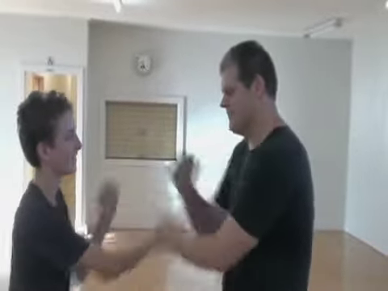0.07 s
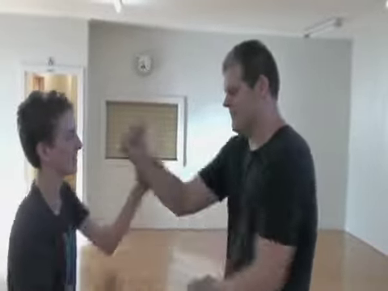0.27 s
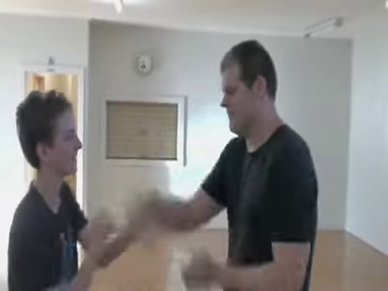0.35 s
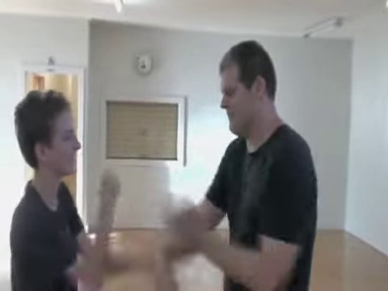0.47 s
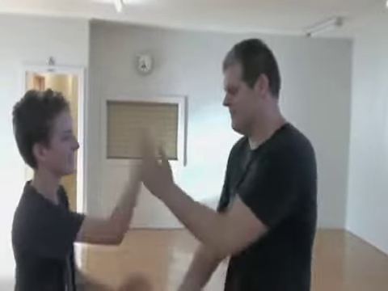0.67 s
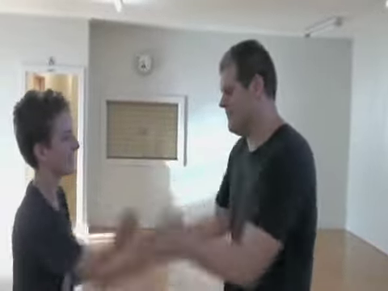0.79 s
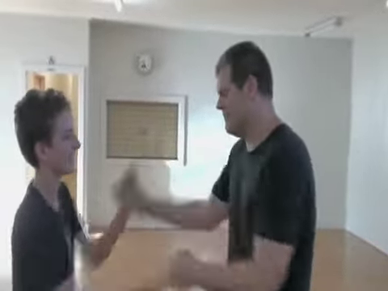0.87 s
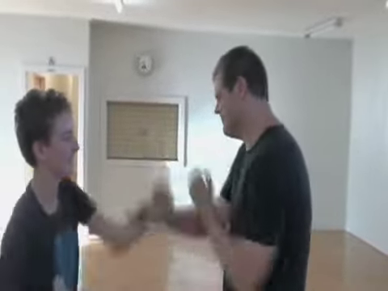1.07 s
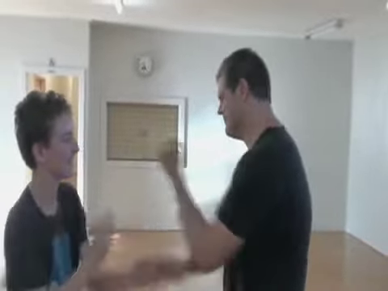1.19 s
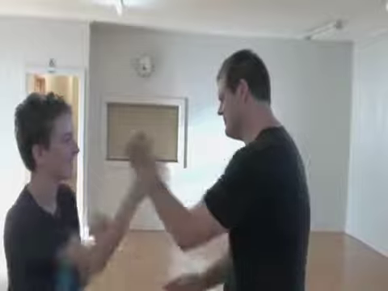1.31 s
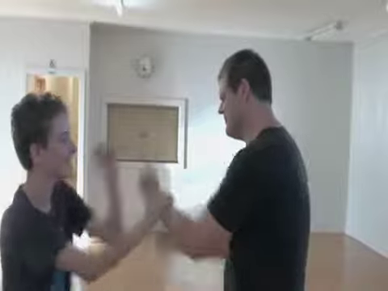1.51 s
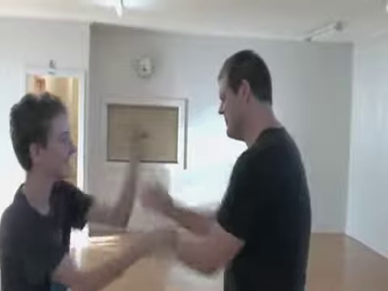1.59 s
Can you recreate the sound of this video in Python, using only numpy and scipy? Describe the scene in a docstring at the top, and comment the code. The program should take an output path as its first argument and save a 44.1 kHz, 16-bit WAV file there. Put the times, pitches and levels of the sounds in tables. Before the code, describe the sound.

Four sharp skin slaps ring out in an empty room over faint rumble and hiss.

```python
"""Four hand and forearm slaps in a bare, hard room, a few metres from a small microphone pair.
Low rumble and hiss come first. At 0.22 s and 0.63 s single slaps land, each a crack of trapped air with
a patter of fingers; a double hit follows at 0.95 s and a cluster of four contacts at 1.34 s. Each crack
flutters between floor and ceiling, then melts into a one-second tail. From 0.1 s to the end, the whole
sound drops out briefly every half second."""
import sys
import numpy as np
from scipy import signal
from scipy.fft import rfft, irfft
from scipy.io import wavfile
from scipy.ndimage import uniform_filter1d

SR = 44100
rng = np.random.default_rng(int(sys.argv[2]) if len(sys.argv) > 2 else 0)


def to_wav(sig):
    """Store sig (one row per channel, or 1-D mono) as 16-bit WAV at the path in sys.argv[1].

    Samples outside -1..1 are clipped; the rate is SR.
    """
    pcm = np.clip(np.atleast_2d(sig), -1, 1) * 32767
    pcm = np.round(pcm).astype(np.int16)
    wavfile.write(sys.argv[1], SR, pcm.T)  # frames by channels


N = 72765

# Tone of the rumble and hiss: pitch_hz, relative_level_db
AIR_COLOUR = [(20, -44), (33, -12), (45, -5.5), (65, -3), (100, -1.5), (134, -0.5), (160, -2.5), (200, -1),
              (266, -4.5), (320, -6.5), (460, -11), (570, -7), (800, -12.5), (1200, -14.5), (1670, -15.5),
              (2900, -22), (5200, -28.5), (12000, -34.5), (16000, -39.5)]
# Stereo width of the rumble and hiss: pitch_hz, side_minus_mid_db
AIR_WIDTH = [(60, -28), (110, -25.5), (200, -19.5), (380, -11), (700, -7.5), (1290, -6), (2380, -6.5),
             (4400, -5.5), (8120, -7.5), (15000, -22.5)]
# Slow level ride on the rumble and hiss: time_s, level_db
AIR_RIDE = [(0, -2), (.2, 0), (.45, -0.5), (.75, -1), (1.0, -0.5), (1.3, 0), (1.65, -0.5)]
# Time the tail takes to fall by 60 dB: pitch_hz, decay_s
TAIL_DECAY = [(300, 1.0), (1000, 1.0), (3000, 1), (6000, 0.75), (10000, 0.61), (16000, 0.4)]
# Tone of the tail: pitch_hz, level_db
TAIL_COLOUR = [(300, -5), (600, 0.5), (1200, 5), (1650, -8.5), (2100, 1), (2750, -7.5), (3350, 3.5),
               (4100, 2), (4700, 3), (6000, -3), (8000, -1), (10000, -5.5), (16000, 3.5)]
# Stereo width of the tail: pitch_hz, side_minus_mid_db
TAIL_WIDTH = [(60, -22), (110, -18), (200, -12), (380, -19), (700, -10), (1290, -17), (2380, -7.5),
              (4400, -18), (8120, -16.5), (15000, -22)]
# Skin contacts that make up the slaps; the later levels are relative to level_db:
# start_s, level_db, patter_db, patter_fade_ms, thud_db, body_hz, body_db, snap_hz, snap_q,
# sizzle_hz, sizzle_db, first_echo_db, second_echo_db, round_trip_db, tail_send_db
CONTACTS = [ (0.2244, -13, -3.5, 4.4, -8.5, 1220, -13, 3030, 1.22, 5800, 0, 7.5, 2.5, -39, -3),
            (0.6250, -34.5, -3.5, 3.5, 3, 580, 8.5, 2300, 1.15, 7600, 4, 5, 2.5, -6, -3),
            (0.9510, -51, 10, 8.2, -11, 2000, -14, 4730, 1.1, 10500, -15, -4, -21, -14, 3),
            (0.9566, -31.5, -3.5, 5.2, -1, 2580, -2, 5300, 4.2, 9300, -1.5, -7, -1.5, -32, -4),
            (1.335, -62, 2, 4.3, -6, 1000, -12, 4000, 1.5, 10760, 2, 0, -10, -17, 7),
            (1.34, -42.5, 6, 3.1, -6, 1100, -8, 2800, 0.41, 8000, -6, 11.5, -6, -14, 1),
            (1.3443, -35.5, 9, 1.9, -8, 1150, -2.5, 2450, 1.26, 6700, 2.5, 2, 4.5, -3, 4),
            (1.378, -44.5, 7, 9.2, -23, 1210, -10, 2370, 6.2, 6450, -5.5, 8, 0.5, -13, 0), ]
# Echo delays, one row per contact: first_echo_ms, second_echo_ms, round_trip_ms
ECHO_DELAYS = [(5.2, 10.5, 15.3), (2.3, 7.6, 15), (4.7, 10, 15.3), (4.7, 10, 15.3), (4.8, 7.5, 14.6),
               (1.5, 7.5, 14.6), (6.4, 7.5, 14.6), (4.5, 7, 14.6)]
# Brief holes in the sound: start_s, length_s, depth_db, fade_back_s
GAPS = [(0.1028, 0.018, -30.5, 0.0067), (0.604, 0.016, -38, .003), (1.1032, 0.008, -25.5, 0.0096),
        (1.6035, 0.033, -32, 0.0056)]

AIR_DB, SWELL_DB, FLICKER_DB = -53.5, .6, 1.0
TAIL_BUILD_S = .018
ROUND_S, ROUND_DB, ROUND_HZ = .01545, -2.5, 16000  # one trip floor-ceiling-floor: time, loss, dulling
SOFT_HZ = 10500  # skin gives, softening the treble above this
THUD_HZ, THUD_Q, BODY_Q, SIZZLE_Q = 375, 4, 2.5, 1.5
PATTER_LEAD_S, ECHO_PATTER_DB = .0019, -7.5  # the patter scatters, so the echoes carry less of it
SLAP_SIDE_DB, HALF_MIC_LAG_S = -23, .000004  # the slaps sit slightly left: louder and earlier there
CUT_S, TOP_HZ = .0018, 16100


def undb(db):
    """Decibels to amplitude."""
    return 10 ** (np.asarray(db) / 20)


def curve_at(hz, table):
    """Read a table's curve at hz, along a log frequency axis."""
    pitches, values = np.array(table, float).T
    return np.interp(np.log(np.maximum(hz, 1)), np.log(pitches), values)


def resonate(x, hz, q):
    """Two-pole resonance, gain 1 at the centre."""
    return signal.lfilter(*signal.iirpeak(hz, q, fs=SR), x)


def delay(x, seconds):
    """Shift in time, even by a fraction of a sample."""
    return irfft(rfft(x) * np.exp(-2j * np.pi * np.fft.rfftfreq(N, 1 / SR) * seconds), N)


def drift(rate_hz):
    """Smooth random wander with a spread near 1."""
    hold = int(SR / rate_hz)
    steps = np.repeat(rng.standard_normal(N // hold + 1), hold)
    return 1.725 * uniform_filter1d(uniform_filter1d(steps, hold), hold)[:N]


def stereo_noise(envelope, width):
    """Third-octave bands of unrelated mid and side noise, each shaped in time by envelope(hz)."""
    f = np.fft.rfftfreq(N, 1 / SR)
    mid_spectrum, side_spectrum = rfft(rng.standard_normal((2, N)))
    noise = 0
    for hz in 25 * 2 ** (np.arange(29) / 3):
        bands_away = 3 * np.log2(np.maximum(f, 1) / hz)
        window = np.cos(np.pi / 2 * np.clip(bands_away, -1, 1)) ** 2
        mid = irfft(mid_spectrum * window, N)
        side = irfft(side_spectrum * window, N) * undb(curve_at(hz, width))
        noise = noise + envelope(hz) * np.array([mid + side, mid - side])
    return noise


def room_air():
    """A bed of rumble and hiss whose bands swell together and flicker on their own."""
    swell_db = SWELL_DB * drift(rate_hz=2.36)
    envelope = lambda hz: undb(curve_at(hz, AIR_COLOUR) + swell_db + FLICKER_DB * drift(rate_hz=11.87))
    bed = stereo_noise(envelope, AIR_WIDTH)
    ride_db = np.interp(np.arange(N) / SR, *np.array(AIR_RIDE).T)
    return bed / np.sqrt(np.mean(bed ** 2)) * undb(AIR_DB + ride_db)


def room_tail(send):
    """Diffuse reverb: a wash that builds up, then dies away fastest in the treble."""
    t = np.arange(N) / SR
    wash = stereo_noise(lambda hz: undb(-60 * t / curve_at(hz, TAIL_DECAY)), TAIL_WIDTH)
    colour = undb(curve_at(np.fft.rfftfreq(N, 1 / SR), TAIL_COLOUR))
    build = 1 - np.exp(-t / TAIL_BUILD_S)
    response = irfft(rfft(wash) * colour, N) * build / 10
    return signal.fftconvolve(send[None], response, axes=1)[:, :N]


def flutter(x):
    """Sound bounces between floor and ceiling, weaker and duller each round."""
    f = np.fft.rfftfreq(N, 1 / SR)
    loss = undb(ROUND_DB) / (1 + (f / ROUND_HZ) ** 2)
    round_trip = loss * np.exp(-2j * np.pi * f * ROUND_S)
    return irfft(rfft(x) / (1 - round_trip), N)


def skin_contact(start_s, level_db, patter_db, patter_fade_ms, thud_db, body_hz, body_db,
                 snap_hz, snap_q, sizzle_hz, sizzle_db):
    """Two layers, a crack of trapped air and a patter of fingers, coloured by four broad resonances."""
    t = np.arange(N) / SR - start_s
    crack = -3 * np.sinc(t * SR) * (abs(t) < .001)
    since_touch = np.maximum(t + PATTER_LEAD_S, 0)  # the fingers land just ahead of the crack
    attack = np.minimum(since_touch / PATTER_LEAD_S, 1)
    decay = np.exp(-since_touch * 1000 / patter_fade_ms)
    patter = undb(patter_db) * rng.standard_normal(N) * attack * decay
    push = signal.lfilter(*signal.butter(1, SOFT_HZ, fs=SR), [crack, patter])
    thud = undb(thud_db) * resonate(push, THUD_HZ, THUD_Q)
    body = undb(body_db) * resonate(push, body_hz, BODY_Q)
    snap = resonate(resonate(push, snap_hz, snap_q), snap_hz, q=.64)
    sizzle = undb(sizzle_db) * resonate(resonate(push, sizzle_hz, SIZZLE_Q), sizzle_hz, q=.5)
    return undb(level_db) * (thud + body + snap + sizzle)


def scene():
    """The slaps and their echoes, just left of centre, over the tail and the room's air."""
    early, bounced, tail_send = 0, 0, 0
    for contact, (first_ms, second_ms, round_ms) in zip(CONTACTS, ECHO_DELAYS):
        *hit, first_db, second_db, round_db, send_db = contact
        crack, patter = skin_contact(*hit)
        echo = crack + undb(ECHO_PATTER_DB) * patter
        early += crack + patter + undb(first_db) * delay(echo, first_ms / 1000)
        bounced += undb(second_db) * delay(echo, second_ms / 1000)
        bounced += undb(round_db) * delay(echo, round_ms / 1000)
        tail_send += undb(send_db) * crack
    mid = early + flutter(bounced)
    left_lead = (delay(mid, -HALF_MIC_LAG_S) - delay(mid, HALF_MIC_LAG_S)) / 2
    side = undb(SLAP_SIDE_DB) * mid + left_lead
    return np.array([mid + side, mid - side]) + room_tail(tail_send) + room_air()


def record(dry):
    """Short dropouts cut in fast and fade back; a steep low-pass then trims the very top."""
    t = np.arange(N) / SR
    gain_db = 0
    for start_s, length_s, depth_db, fade_back_s in GAPS:
        end_s = start_s + length_s
        corners_s = [start_s - CUT_S, start_s + CUT_S, end_s, end_s + fade_back_s]
        gain_db += np.interp(t, corners_s, [0, depth_db, depth_db, 0])
    low_pass = signal.ellip(10, .2, 70, TOP_HZ, fs=SR, output="sos")
    return signal.sosfilt(low_pass, dry * undb(gain_db))


dry = scene()
out = record(dry)
to_wav(out)
```